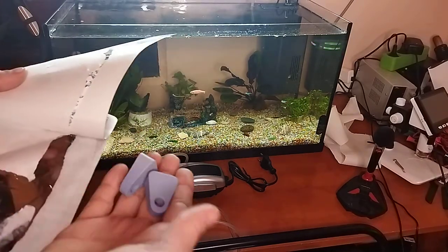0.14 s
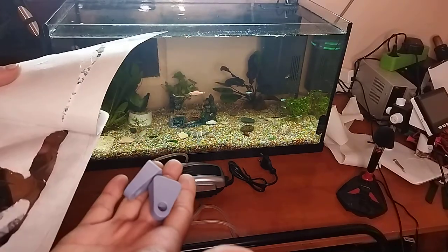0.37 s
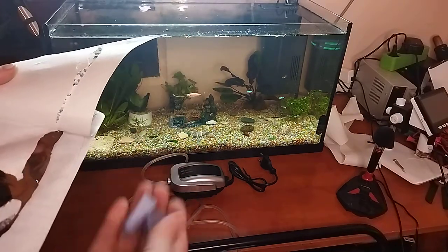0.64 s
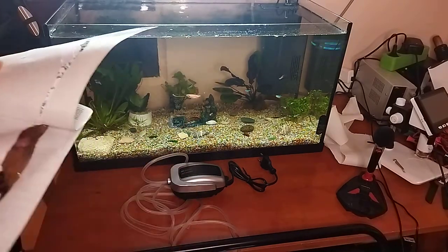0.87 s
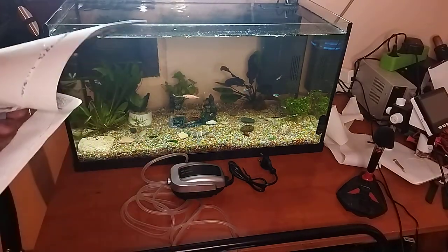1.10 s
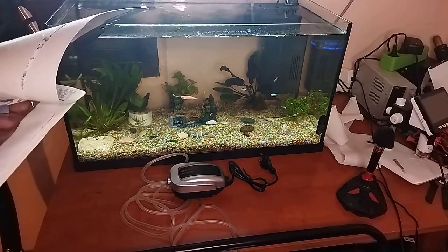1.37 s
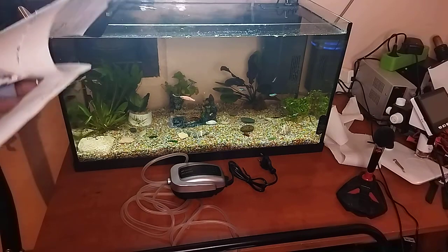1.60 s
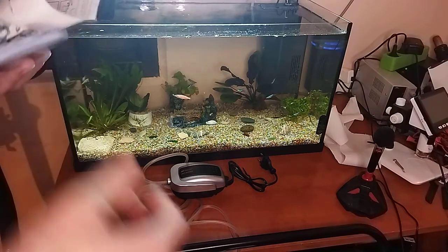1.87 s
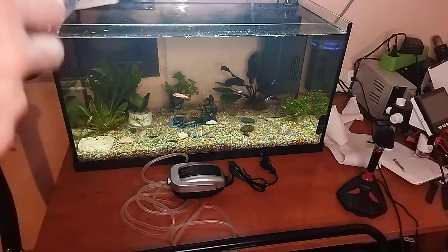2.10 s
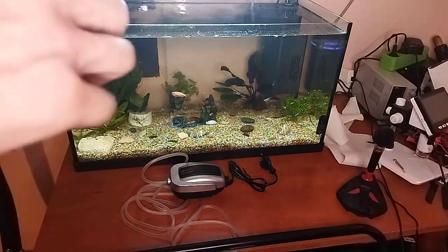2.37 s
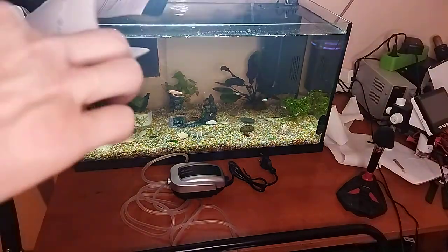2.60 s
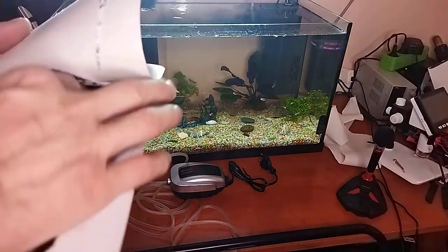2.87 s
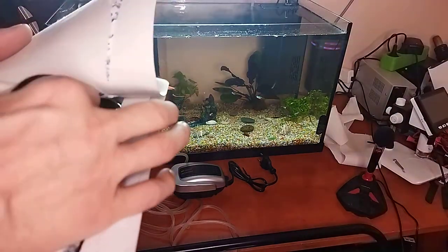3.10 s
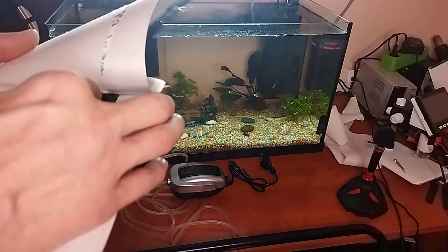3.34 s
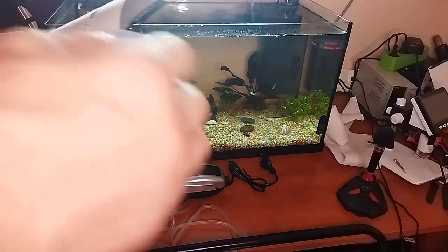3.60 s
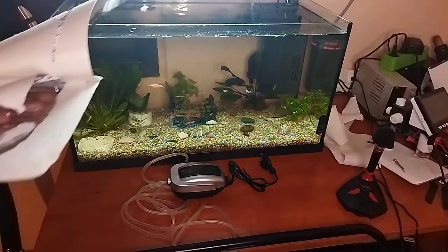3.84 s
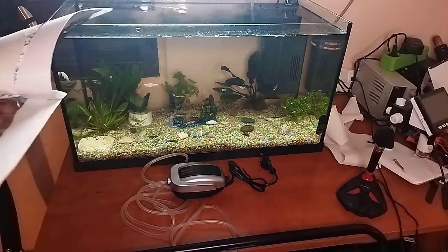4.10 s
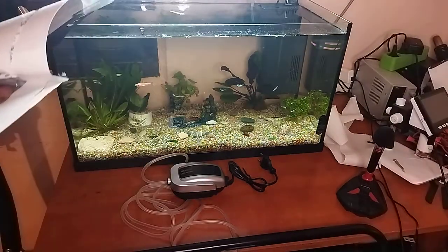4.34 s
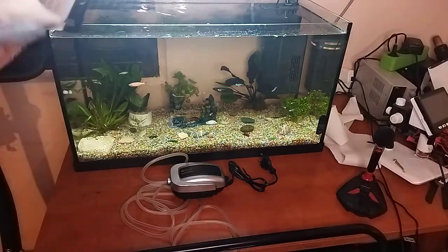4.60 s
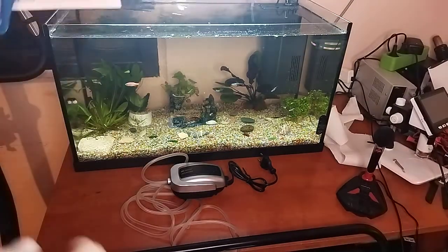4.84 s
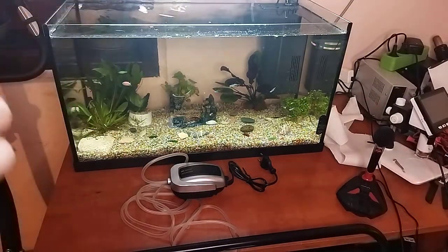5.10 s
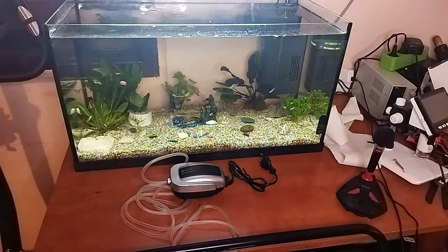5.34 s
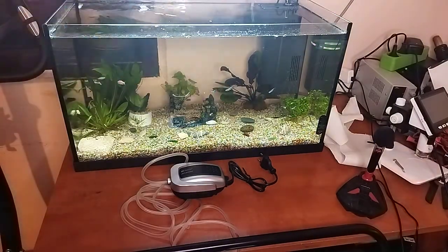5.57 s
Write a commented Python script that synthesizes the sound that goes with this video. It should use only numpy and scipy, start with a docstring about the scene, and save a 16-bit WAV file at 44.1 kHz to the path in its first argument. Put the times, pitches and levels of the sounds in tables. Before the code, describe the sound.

Small plastic clips tick in a palm, tumble loudly onto a desk, paper rustles and snaps, then another clip drops and bounces.

```python
"""Fingers slide on a large sheet of paper and its creases snap, close to the left of a microphone pair.
Small plastic clips tick in a palm, then out of sight they drop on a desk in a small quiet room and clatter.
Paper is clumped noise, crackles and pitched pops; clips are gritty contacts, ringing modes on the desk.
Echoes are sparse decaying taps. Low hum and hiss lie under all; a thin whine sounds briefly near the start.
The input rounds the loudest knocks."""
import sys
import numpy as np
from scipy import signal
from scipy.io import wavfile
from scipy.ndimage import uniform_filter1d

SR = 44100
rng = np.random.default_rng(int(sys.argv[2]) if len(sys.argv) > 2 else 0)


def field_ratio(decibels):
    """Amplitude ratio for a level in dB (20 dB per decade); scalars and array-likes work."""
    return 10 ** (np.asarray(decibels, dtype=float) / 20)


def generate_wav(signal):
    """Clip the signal to [-1, 1] and save it as 16-bit WAV at the path in sys.argv[1]."""
    frames = np.transpose(np.atleast_2d(signal))
    scaled = np.clip(frames, -1, 1) * 32767
    pcm = np.round(scaled).astype(np.int16)
    wavfile.write(sys.argv[1], SR, pcm)


N = 251811  # length in samples

# Table levels are relative: each source sets its own gain.
# room floor, a spectral shape: [f/Hz, level/dB]
FLOOR_SPECTRUM = [(15, -69.5), (25, -43), (85, -12.5), (192, -8.5), (226, -5), (252, -8), (634, -14),
                  (687, -11.5), (766, -16.5), (1510, -21.5), (4360, -30), (7110, -41), (9580, -34),
                  (15200, -33), (16500, -41.5)]
FLOOR_DB = -61.5  # rms level of the floor
# its stereo width: [f/Hz, side minus mid level/dB]
FLOOR_SIDE = [(60, 8), (110, -7.5), (200, -12.5), (380, -2.5), (700, -1.5), (1290, 1), (2380, 1),
              (4400, 1.5), (8120, -2.5), (15000, 12.5)]
# wavering hum of a small motor: [mean f/Hz, level/dB]
MOTOR_HUM = [(204, -75.5), (227, -69), (338, -71)]
# faint, brief whine from electronics: (f/Hz, level/dB, start t/s, start of fade-out t/s)
WHINE = (9873, -86, .28, 1.0)

# decay of the room: [f/Hz, t60/s]
ROOM_T60 = [(150, 0.34), (500, 0.25), (1500, 0.26), (4000, 0.26), (8000, .25), (14000, 0.34)]
# likeness of the echoes at the two microphones: [f/Hz, likeness 0-1]
ROOM_LIKENESS = [(100, 0.81), (300, 1), (600, 0.14), (1200, 0.12), (4000, 0.014)]
# soft furnishings darken the echoes: [f/Hz, level/dB]
WALLS = [(100, 6), (1000, 0.5), (4000, 0.5), (8000, -3.5), (16000, -11)]

# a handful of clips tumbling on the desk:
# [t/s, clack level/dB, flatness: thump over clack level/dB, hardness: click over clack level/dB]
TUMBLE = [(1.4106, -31, -12, -18), (1.4505, -22, -11.5, -7), (1.478, -15.5, -5, -13.5),
          (1.5203, -19, -15, -4.5), (1.5476, -10, -17, -13), (1.5866, -18, -25, -9), (1.607, -7, -21.5, -5),
          (1.699, -16, -10, -19.5), (1.7387, -7.5, -25.5, 3)]
# ringing modes in the tumble: [f/Hz, width before damping/Hz, level/dB]
TUMBLE_MODES = [(630, 18, 17.5), (950.4, 7.7, 6), (1110, 190, 23.5), (1600, 57, -2), (2070, 120, -4.5),
                (2320, 49, 7), (3040, 81, 23), (3370, 18, 4.5), (3994, 160, -7.5), (4480, 230, -3),
                (5180, 160, -21), (5790, 36, -13.5), (6240, 120, 2.5), (7660, 83, 6)]
# a clip nudged, dropped and bouncing, twice:
# [t/s, clack level/dB, thump over clack level/dB, click over clack level/dB, landing face 0-1]
BOUNCE = [(4.2215, -48, 1, -29, 0.13), (4.3046, -50, -2, 6.5, 1), (4.3819, -9, -23, -3, 0),
          (4.4337, -20.5, -20.5, -1.5, 0.36), (4.5951, -44, -1, -8, 1), (4.6912, -34.5, -6.5, -14.5, 1),
          (4.7572, -39, -7, -2, 0.8), (4.7635, -2.5, -32.5, -3.5, 1), (4.8098, -14, -22, -3.5, 1)]
# ringing modes of the bounce: [f/Hz, width before damping/Hz, level/dB, level change on the other face/dB]
BOUNCE_MODES = [(485, 45, -6, 0), (925, 45, 10, -9), (1050, 45, 3, -6), (1146, 40, -6, 12),
                (1790, 60, -2, 3), (2355, 110, 11, -4), (2050, 80, -3, 3), (2920, 70, -6, 6),
                (3270, 70, -3, 2), (3670, 90, 0, 0), (4330, 110, -4, 0), (4030, 80, -9, 0),
                (4500, 90, -7, 0), (5250, 90, -14, 0)]
HOLLOW_SHARE, EDGE_SHARE = 0.59, 1.5  # hollow knock follows flatness, sharp edge follows hardness (dB per dB)
EDGE_DB_PER_DB = -0.3  # light contacts are relatively richer in edge

# clips ticking against each other in the palm: [t/s, level/dB, t60 of the contact/s]
PALM_TICKS = [(.0034, -26.5, 0.02), (0.103, -52, 0.0079), (0.1489, -37, 0.08), (0.287, -63, .006),
              (0.6852, -56, 0.011), (0.695, -53, 0.012), (.753, -50, 0.012), (0.762, -52, 0.0066),
              (.77, -59, .006), (.782, -51, 0.014), (0.7932, -53, 0.0055), (0.801, -49, .006),
              (0.808, -49, .006)]
# colour of a palm tick: [f/Hz, level/dB]
TICK_SPECTRUM = [(300, -28), (1400, -1), (2300, 0), (5500, 5.5), (9000, -5), (16000, -18.5)]

# creases snapping: [t/s, snap level/dB, pop level/dB, pop f/Hz, treble over snap level/dB]
SNAPS = [(1.056, -50, -70, 336, -14.5), (1.201, -69.5, -61.5, 334.4, 11), (1.2201, -65, -61, 304, 3.5),
         (2.0965, -56.5, -47, 492.5, 3), (2.1633, -49, -73, 690, 3), (2.389, -23, -38.5, 400, -11),
         (2.588, -40.5, -37, 1120, 4.5), (2.6146, -36, -35, 714, -39), (2.6522, -57, -45.5, 316.3, 11.5),
         (2.7367, -29.5, -35.5, 730, -4.5), (2.7755, -32.5, -45, 695, 10), (2.7816, -26, -28.5, 762, -6.5),
         (2.9337, -32, -28, 714, -22.5), (2.948, -39.5, -45, 760, -17), (3.046, -47.5, -54, 619, 4.5),
         (3.0726, -41, -40, 725, 1.5), (3.19, -70, -37, 1073, -27), (3.2628, -51, -45.5, 665, -3),
         (3.4032, -42, -42.5, 302, -13.5), (3.466, -32.5, -44, 645, -16.5), (3.661, -41, -70, 300.6, -3),
         (5.0201, -27.5, -38.5, 1340, -19), (5.514, -52.5, -70, 370, -8), (5.589, -33, -52, 451, -13),
         (5.6201, -24, -38.5, 435.8, -10), (5.638, -36, -36.5, 352, -12.5)]
POP_CYCLES = 34.6  # cycles in which a pop falls by 60 dB

# long drag of the fingers along the sheet: [t/s, hiss level/dB, dull rustle over hiss level/dB]
DRAG = [(2.26, -88, 1), (2.37, -64.5, 4), (2.43, -56, 3), (2.56, -52, 2), (2.69, -55, 2.5),
        (2.76, -43.5, 1), (2.84, -44, -1.5), (3.05, -51.5, 1.5), (3.101, -41.5, -8), (3.16, -59, 6.5),
        (3.2, -48.5, -0.5), (3.26, -56.5, 0), (3.351, -45, -3.5), (3.39, -55.5, 4.5), (3.5, -46.5, -7),
        (3.65, -60.5, 1), (3.72, -72.5, 3), (3.82, -84, 2), (4.2, -77, -3), (4.3, -75, 5)]
# short brushes and shakes: [start t/s, rise/s, fade/s, hiss level/dB, dull rustle over hiss level/dB]
BRUSHES = [(.74, .04, 0.11, -75.5, 10.5), (.92, 0.013, 0.42, -73, -7), (1.02, 0.026, 0.24, -69, 4.5),
           (1.195, 0.02, 0.056, -63.5, -14), (2.039, 0.051, 0.047, -58.5, 2), (2.156, 0.0046, .1, -60, 2.5),
           (2.384, 0.0039, 0.036, -36.5, 2.5), (2.764, 0.02, 0.055, -32, 2.5),
           (3.654, 0.0088, 0.046, -55.5, 0.5), (4.964, 0.018, 0.12, -51.5, -2.5),
           (5.129, 0.033, 0.12, -64, -3), (5.314, 0.011, 0.16, -65.5, -1.5),
           (5.586, 0.0012, 0.094, -52, 0.5), (5.619, 0.0017, 0.02, -37.5, -8.5),
           (5.63, 0.0077, 0.15, -56, 2)]
BRUSH_FADE_DB, BRUSH_BEND, BRUSH_SWELL = -20, 1.4, 2.1  # change after the fade time; shapes of fade and rise
# fibres hissing under the fingers: [f/Hz, level/dB]
HISS_SPECTRUM = [(1470, -33), (2500, -2.5), (3300, -4), (5640, -6.5), (6400, -3.5), (7150, -6.5),
                 (8770, -1), (11100, -3.5), (15100, -2.5), (16100, -6.5), (16500, -33.5)]
# duller rustle of the sheet: [f/Hz, level/dB]
RUSTLE_SPECTRUM = [(120, -38.5), (300, -5), (700, -5.5), (1500, 0), (3000, -6), (5000, -4.5), (8000, -46.5)]
CRACKLES_PER_S, CRACKLE_DB = 93, -10.5  # tiny creases giving way: mean rate, level over the rustle


def read(points, hz):
    """A spectrum joined by straight lines on a log-frequency axis."""
    f, value = np.transpose(points)
    return np.interp(np.log(hz + 1), np.log(f + 1), value)


def evened(x):
    """Scales to rms 1."""
    return x / np.sqrt(np.mean(x ** 2) + 1e-20)


def add(mix, s, sound):
    """Mixes a sound in at time s."""
    part = mix[round(s * SR):][:len(sound)]
    part += sound[:len(part)]


def colour(x, points, size=1024):
    """A causal, minimum-phase filter with the given spectrum in dB."""
    log_gain = read(points, np.fft.rfftfreq(size, 1 / SR)) * np.log(10) / 20
    whole = signal.hilbert(np.r_[log_gain, log_gain[-2:0:-1]])
    response = np.fft.ifft(np.exp(np.conj(whole))).real[:size // 2]
    return signal.oaconvolve(x, response)[:len(x)]


def noise(points, same, size=1024, patchy_db=0):
    """Two channels of noise with a spectrum, a left-right likeness and drifting patches of colour."""
    hz = np.fft.rfftfreq(size, 1 / SR)
    a, b, c, d, patches = rng.standard_normal((4 * N // size + 5, len(hz), 5)).T
    patches = uniform_filter1d(patches, size=size // 40, axis=0)
    patches = evened(uniform_filter1d(patches, size=8192 // size, axis=1))
    same = np.clip(read(same, hz), -1, 1)[:, None]
    left = a + 1j * b
    right = same * left + np.sqrt(1 - same ** 2) * (c + 1j * d)
    z = np.array([left, right]) * field_ratio(read(points, hz)[:, None] + patchy_db * patches)
    return evened(signal.istft(z, nperseg=size, noverlap=3 * size // 4)[1][:, :N])


def burst(t60, rise, grit_db):
    """Micro-impacts under a fast rise and a decay (times in s), and a click of the same energy."""
    t = np.arange(4096) / SR
    grit = rng.choice([-1., 1.], 4096) * field_ratio(grit_db * rng.exponential(1, 4096))
    puff = grit * (1 - np.exp(-t / rise)) * field_ratio(-60 * t / max(t60, .001))
    return puff / np.linalg.norm(puff), 1. * (t == 0)


def background():
    """Air hiss and rumble as shaped noise, motor tones wavering in pitch and level, and a brief thin whine."""
    side_ratio = [(hz, field_ratio(2 * db)) for hz, db in FLOOR_SIDE]
    same = [(hz, (1 - ratio) / (1 + ratio)) for hz, ratio in side_ratio]
    out = field_ratio(FLOOR_DB) * noise(FLOOR_SPECTRUM, same, size=2048)
    for hz, db in MOTOR_HUM:
        waver = evened(uniform_filter1d(rng.standard_normal(N), size=3000))
        out += field_ratio(db + 2.2 * waver) * np.sin(2 * np.pi * np.cumsum(hz + 4 * waver) / SR)
    t = np.arange(N) / SR
    hz, db, start, end = WHINE
    fade = np.interp(t, [start, start + .03, end, end + 0.13], [0, 1, 1, 0])
    return out + field_ratio(db) * np.sin(2 * np.pi * hz * t) * fade


def room(x, gap, build):
    """Sparse taps of random sign build up after a gap (both in s), each band then dying at its own speed."""
    taps, at = np.zeros((2, SR)), np.arange(SR // 12) * 12
    where, signs = at + rng.integers(0, 12, (2, len(at))), rng.choice([-1., 1.], (2, len(at)))
    np.put_along_axis(taps, where, signs, 1)
    taps *= 1 - np.exp(-np.maximum(np.arange(SR) / SR - gap, 0) / build)
    hz, t, z = signal.stft(taps, SR, nperseg=256)
    same = np.clip(read(ROOM_LIKENESS, hz), 0, 1)[:, None]  # long waves reach both microphones alike
    z[1] = same * z[0] + np.sqrt(1 - same ** 2) * z[1]
    decay = field_ratio(-60 * t / np.maximum(read(ROOM_T60, hz), .03)[:, None])
    tail = signal.istft(z * decay, SR, nperseg=256)[1]
    return signal.fftconvolve(colour(x, WALLS)[None], tail / np.linalg.norm(tail[0]), axes=1)[:, :N]


def placed(x, left_db, treble_db, count):
    """A source louder on the left by left_db, by treble_db more in the treble, and earlier by count samples."""
    left, right = (colour(x, [(3000, side * left_db / 2), (9000, side * (left_db + treble_db) / 2)], size=64)
                   for side in (1, -1))
    return np.array([left, np.roll(right, count)])


def knocks(rows, modes, ring_db, spread_db, damping, t60, hollow_over_db, edge_over_db):
    """Each contact is coloured by its hardness and rings the modes: rows for direct sound and room feed."""
    out, t = np.zeros((2, N)), np.arange(4096) / SR
    for s, db, flat_db, hard_db, *face in rows:
        thump_db, click_db = db + flat_db, db + hard_db
        hollow_db = db + hollow_over_db + HOLLOW_SHARE * flat_db
        edge_db = db + edge_over_db + EDGE_SHARE * hard_db + EDGE_DB_PER_DB * db
        desk = [(25, thump_db - 35.5), (60, thump_db - 10), (130, thump_db + 18.5),
                (190, thump_db + 35), (480, thump_db + 37.5)]
        clip = [(1050, hollow_db + 36.0), (2300, db + 28.5), (4200, click_db + 27), (6500, click_db + 16.0)]
        edge = [(9000, edge_db + 30.5), (16000, edge_db + 9.5)]
        ring = np.zeros(4096)
        for hz, width, mode_db, *turn_db in modes:
            level = field_ratio(mode_db + np.dot(face, turn_db) + spread_db * rng.standard_normal())
            ring += level * np.exp(-np.pi * damping * width * t) * np.sin(2 * np.pi * hz * t)
        ring *= field_ratio(ring_db) / np.linalg.norm(ring)
        ring[0] = 1  # the bare crack ahead of the ring
        for row, contact in zip(out, burst(t60, 0.00014, 0.32)):
            add(row, s, signal.fftconvolve(colour(contact, desk + clip + edge), ring))
        corner = [(3000, edge_db - 14.0), (7000, edge_db + 28.0), (16000, edge_db + 5.5)]
        # the tick of hard corners, in the direct sound only
        add(out[0], s, colour(burst(0.012, 0.00029, 0.98)[0], corner))
    return out


def palm_ticks():
    """Light plastic on plastic: a very short bright contact; direct sound and room feed."""
    out = np.zeros((2, N))
    for s, db, t60 in PALM_TICKS:
        for row, contact in zip(out, burst(t60, .0003, 1.2)):
            add(row, s, field_ratio(db + 18) * colour(contact, TICK_SPECTRUM))
    return out


def snaps():
    """A crease lets go in a gritty puff and the buckled patch pops at its pitch: direct sound and room feed."""
    out, t = np.zeros((2, N)), np.arange(2048) / SR
    for s, db, pop_db, pop_hz, treble_db in SNAPS:
        pop = [(40, pop_db), (130, pop_db + 24.5), (0.75 * pop_hz, pop_db + 25.5),
               (pop_hz, pop_db + 41.5), (1.27 * pop_hz, pop_db + 34.5)]
        bright_db = db + treble_db
        crease = [(2300, db + 27.0), (5000, bright_db + 21), (9000, bright_db + 28), (16000, bright_db + 7.0)]
        cycles = t * pop_hz
        ring = field_ratio(pop_db - 1 - 60 * cycles / POP_CYCLES) * np.sin(2 * np.pi * cycles)
        ring *= np.minimum(cycles / 0.65, 1)
        for row, slip in zip(out, burst(0.027, 0.0011, 1.3)):
            add(row, s, colour(slip, pop + crease))
            add(row, s, ring)
    return out


def handling():
    """Levels of hiss and rustle in dB: powers of the drag and of each brush, rising fast and fading, add up."""
    s, hiss_db, over_db = np.transpose(DRAG)
    t = np.arange(N) / SR
    drag_db = np.array([np.interp(t, s, db, -120, -120) for db in (hiss_db, hiss_db + over_db)])
    power = field_ratio(2 * drag_db)
    for start, rise, fade, db, over_db in BRUSHES:
        u = np.arange(0, rise + 2 * fade, 1 / SR)
        swell = np.minimum(u / rise, 1) ** BRUSH_SWELL
        fade_db = BRUSH_FADE_DB * (np.maximum(u - rise, 0) / fade) ** BRUSH_BEND
        shape = swell * field_ratio(db + fade_db)
        add(power[0], start, shape ** 2)
        add(power[1], start, (shape * field_ratio(over_db)) ** 2)
    return 10 * np.log10(power)


def slide():
    """Fibres catch under the fingers: dense hiss in clumps, sparse crackles and a duller rustle of the sheet."""
    hiss_db, rustle_db = handling()
    clumps = evened(uniform_filter1d(rng.standard_normal(N), size=900))
    hiss = noise(HISS_SPECTRUM, [(2000, 0.12), (16000, 0.6)], size=256, patchy_db=2.5)
    hiss *= field_ratio(hiss_db + 1.5 * clumps)

    catches = rng.standard_normal(N) * field_ratio(2.6 * rng.exponential(1, N) + 2.5 * clumps)
    catches *= rng.random(N) < 3000 / SR  # about 3000 a second
    hiss += field_ratio(hiss_db - 13.5) * evened(colour(catches, HISS_SPECTRUM))

    crackles = rng.standard_normal(N) * (rng.random(N) < CRACKLES_PER_S / SR)
    crackles = signal.oaconvolve(crackles, burst(.012, 0.0002, 1.2)[0])[:N]
    hiss += field_ratio(rustle_db + CRACKLE_DB) * evened(colour(crackles, RUSTLE_SPECTRUM))

    rustle = noise(RUSTLE_SPECTRUM, [(200, 0.89), (1000, 0.21), (5000, 0.18)], patchy_db=4.0)
    left, right = hiss + rustle * field_ratio(rustle_db - 0.86 + 1.3 * clumps)
    return np.array([left * field_ratio(4.5), np.roll(right, shift=14) * field_ratio(2.0)])  # nearer the left microphone


def scene():
    """Clips, snaps and palm ticks all echo in the room; the sliding hiss and rustle are dry."""
    tumble, tumble_feed = knocks(TUMBLE, TUMBLE_MODES, ring_db=-17.0, spread_db=3.6, damping=1.5, t60=0.05,
                                 hollow_over_db=3.0, edge_over_db=-17.5)
    bounce, bounce_feed = knocks(BOUNCE, BOUNCE_MODES, ring_db=-5.5, spread_db=2.5, damping=0.7, t60=0.029,
                                 hollow_over_db=-1.5, edge_over_db=-29)
    hands, hands_feed = snaps() + palm_ticks()  # the palm shares the place of the paper
    direct = placed(tumble, left_db=.3, treble_db=7.6, count=1)
    direct += placed(bounce, left_db=-4.2, treble_db=.1, count=-9)
    direct += placed(hands, left_db=6.3, treble_db=0.73, count=15)
    echoes = room(field_ratio(-0.8) * tumble_feed, gap=0.0061, build=0.025)
    echoes += room(field_ratio(-4.0) * bounce_feed, gap=0.0054, build=0.01)
    echoes += room(field_ratio(-3.5) * hands_feed, gap=0.0014, build=0.0015)
    return direct + echoes + slide() + background()


def band_limit(x):
    """A steep low-pass at the top of the band."""
    return signal.sosfilt(signal.butter(12, 16980, fs=SR, output="sos"), x)


def record(dry):
    """The input stage behind the microphones rounds the highest peaks and cuts the deepest bass."""
    held = 1.05 * np.tanh(dry / 1.05)
    held = signal.sosfilt(signal.butter(N=1, Wn=30, btype="high", fs=SR, output="sos"), held)
    return band_limit(held)


dry = scene()
out = record(dry)
generate_wav(out)
```